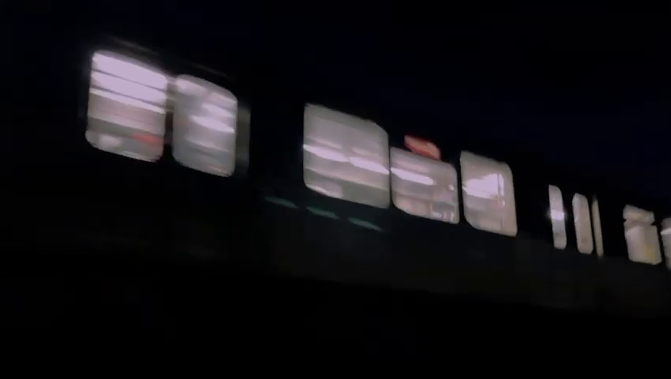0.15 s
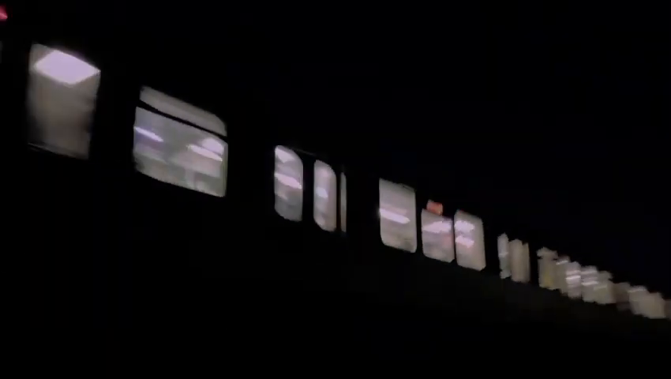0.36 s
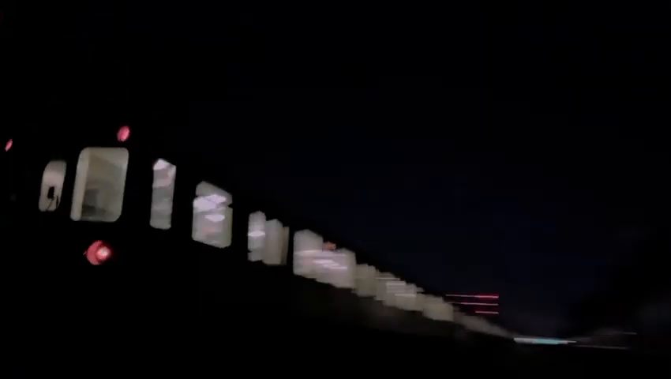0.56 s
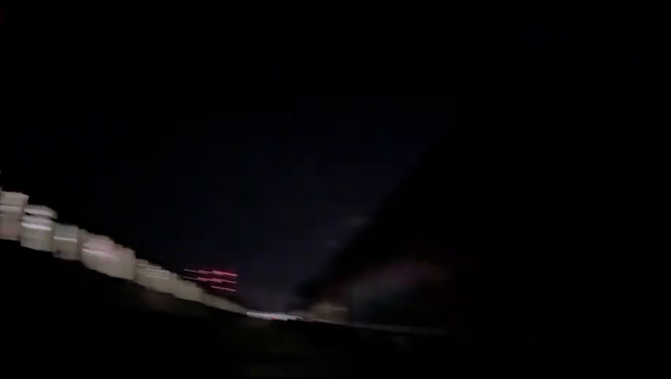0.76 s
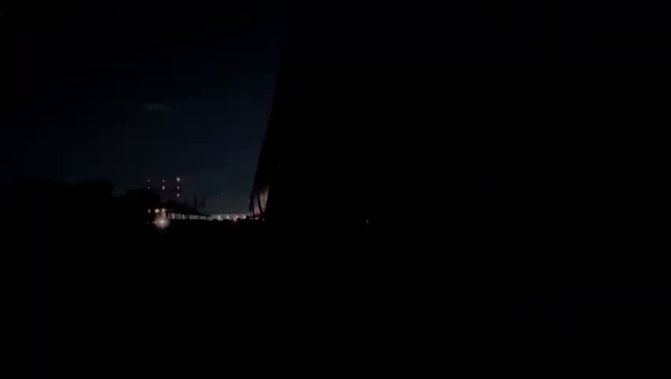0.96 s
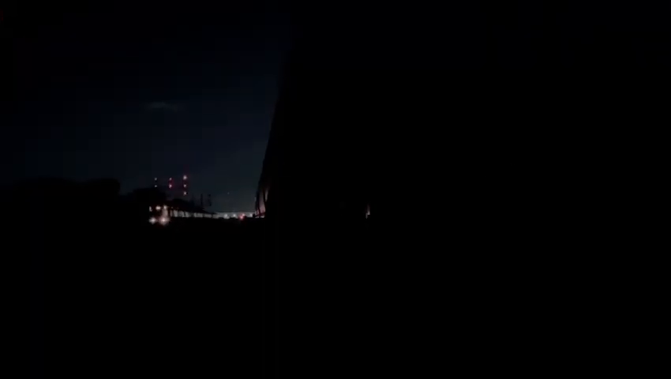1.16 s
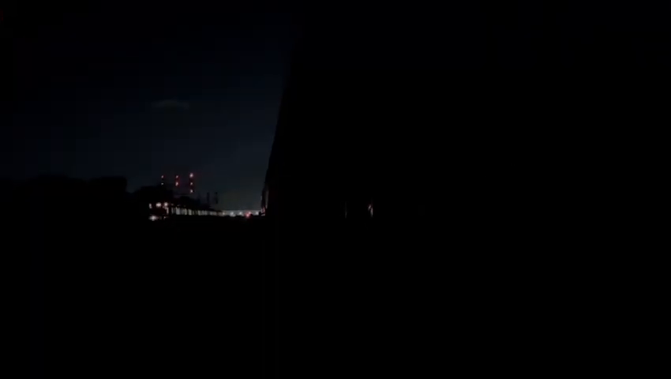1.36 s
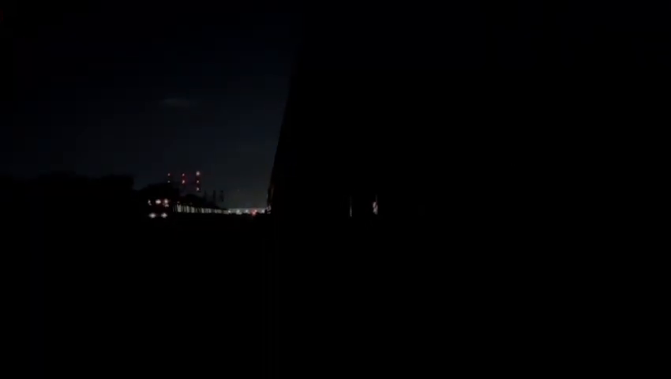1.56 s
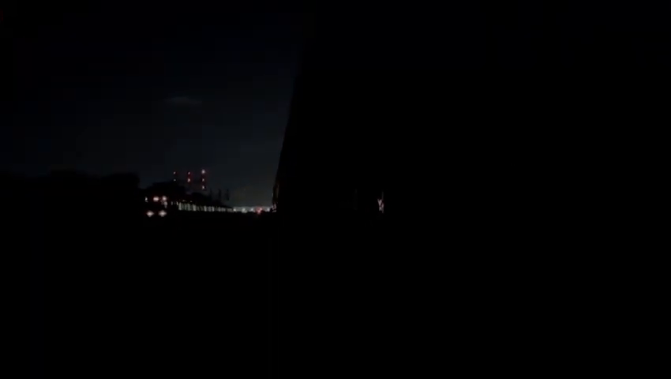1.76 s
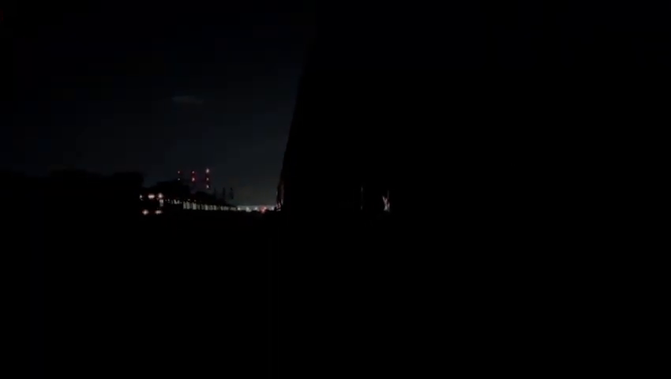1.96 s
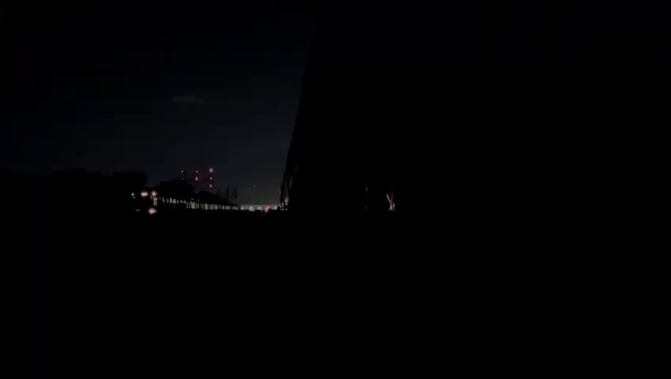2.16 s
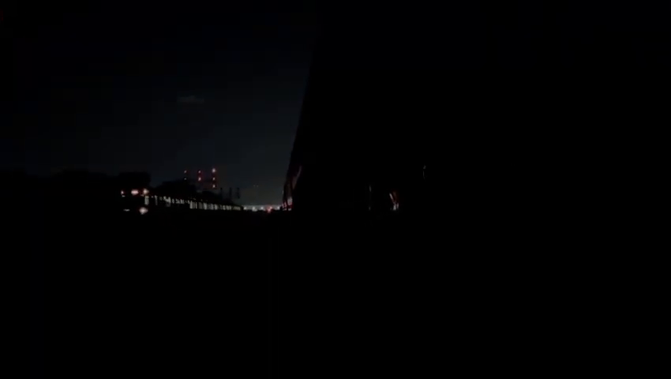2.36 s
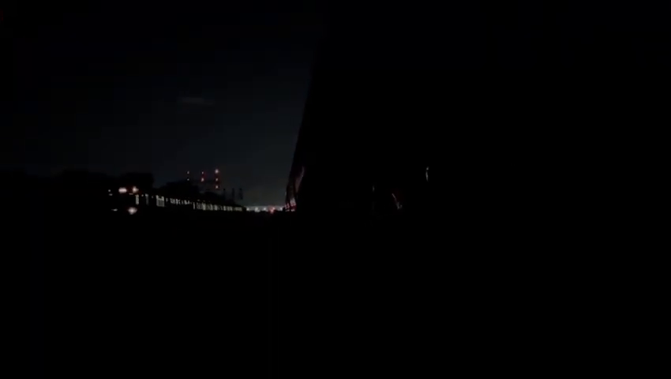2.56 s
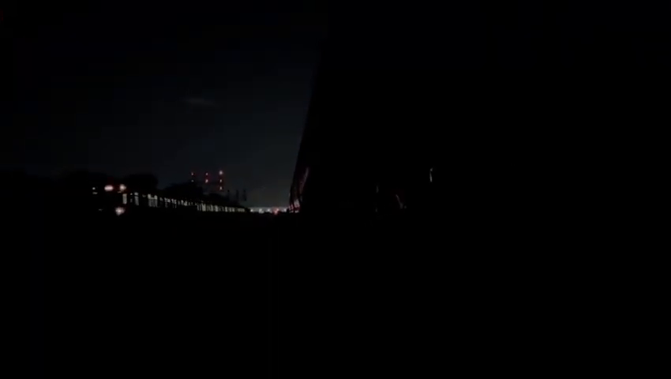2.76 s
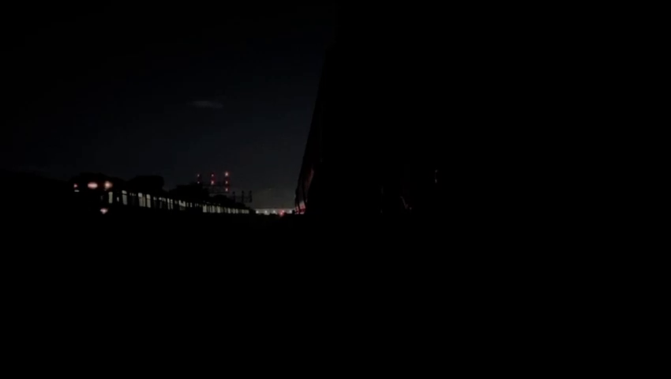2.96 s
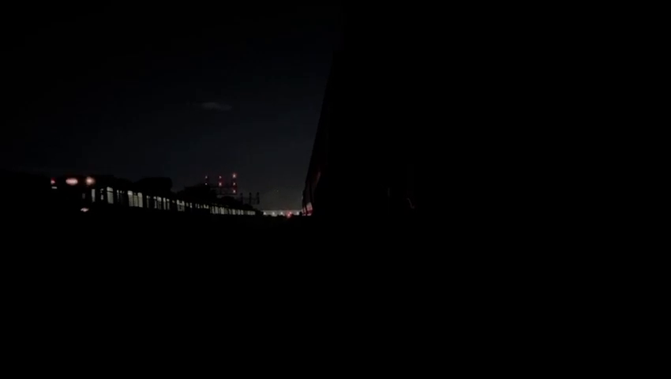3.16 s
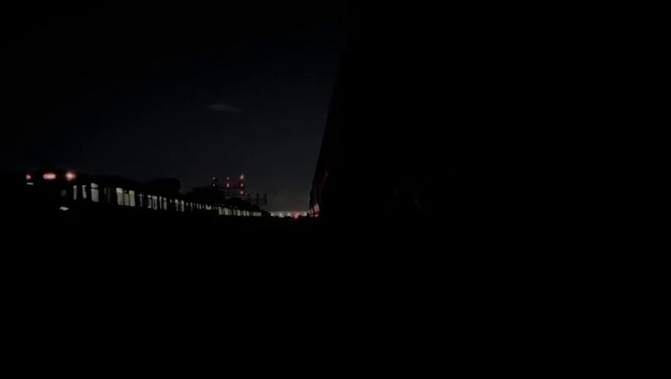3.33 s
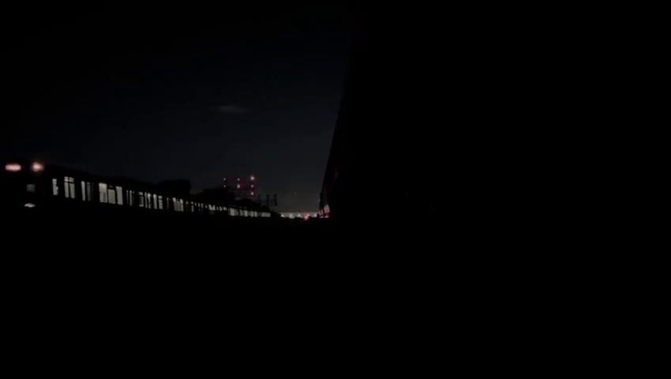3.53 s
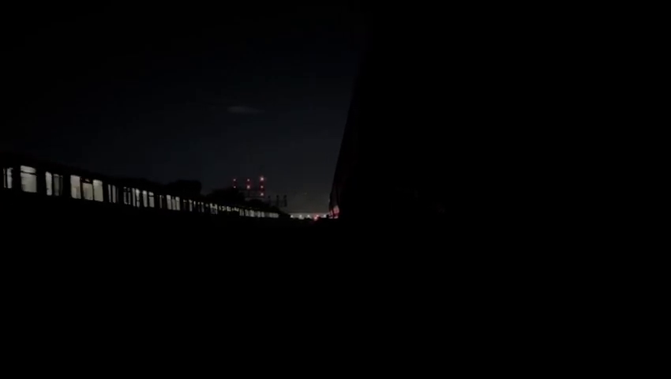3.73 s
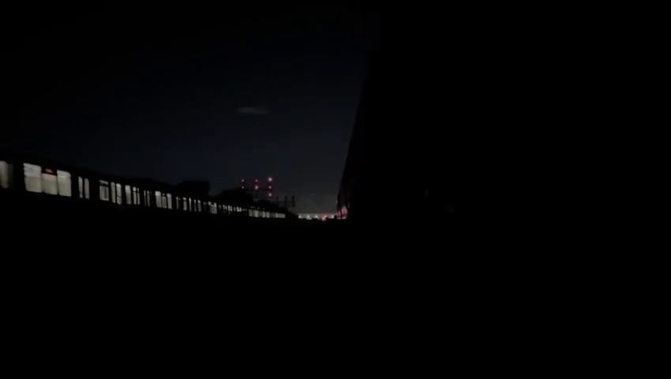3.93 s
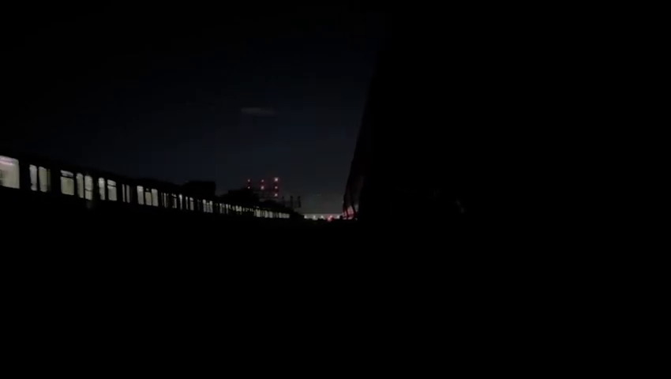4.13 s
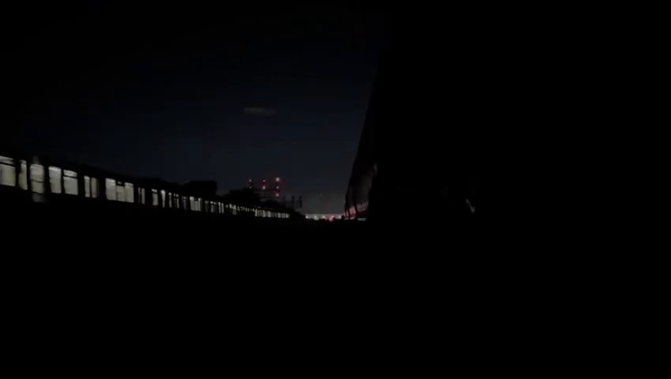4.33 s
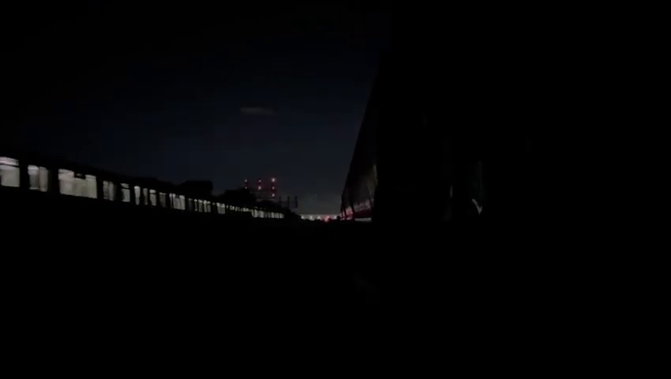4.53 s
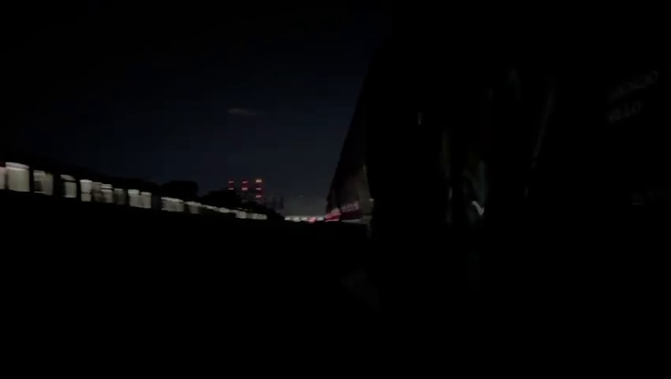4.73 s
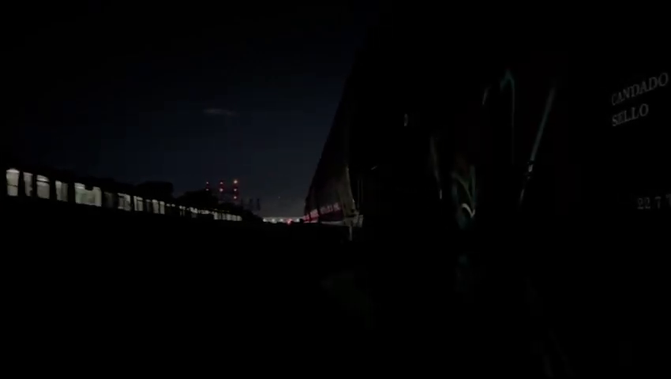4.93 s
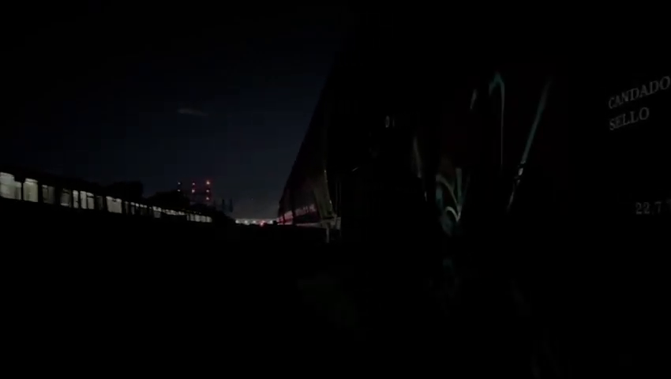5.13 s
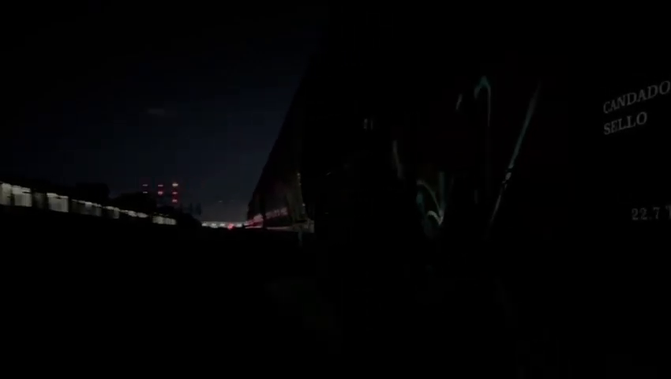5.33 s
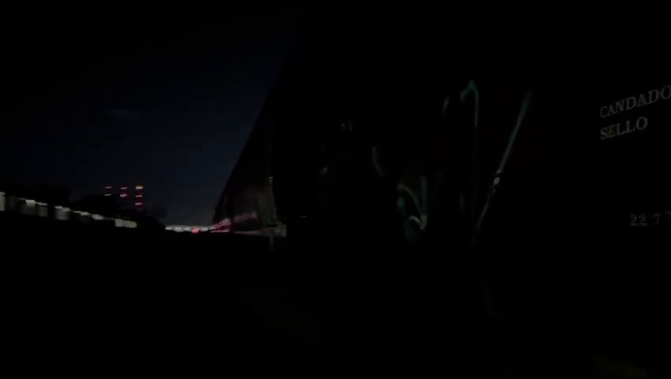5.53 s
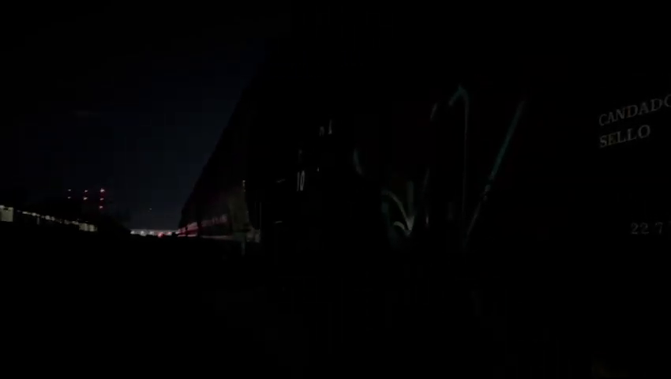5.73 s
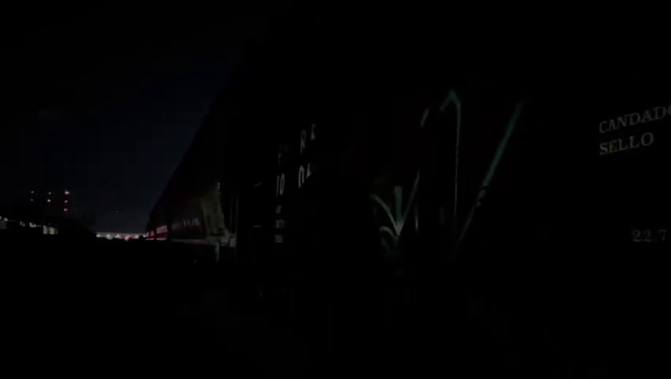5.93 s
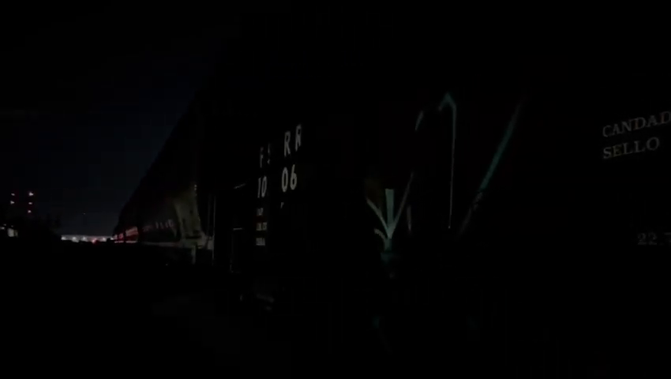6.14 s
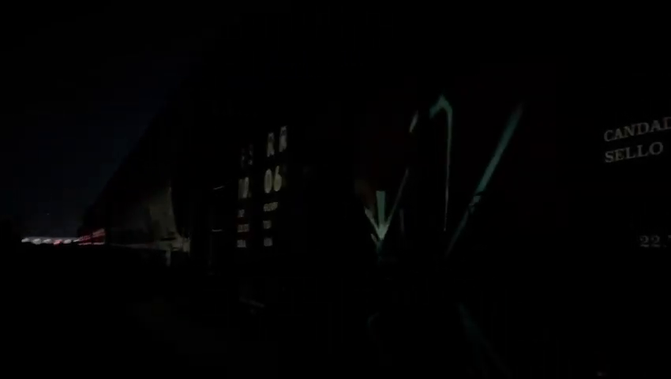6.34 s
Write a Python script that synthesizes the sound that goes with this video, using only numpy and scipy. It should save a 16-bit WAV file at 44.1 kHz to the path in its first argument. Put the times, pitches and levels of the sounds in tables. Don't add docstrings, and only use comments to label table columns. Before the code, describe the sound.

A fast train roars past close by, cuts to a quiet low yard rumble, then a second train approaches with clattering wheels and squeals.

```python
import sys
import numpy as np
from scipy import signal
from scipy.fft import rfft, irfft, next_fast_len
from scipy.io import wavfile
from scipy.ndimage import uniform_filter1d, map_coordinates

SR = 44100
rng = np.random.default_rng(int(sys.argv[2]) if len(sys.argv) > 2 else 0)


def invert_db(level):
    return 10 ** (np.asarray(level, dtype=float) / 20)


def dump_mix(stems):
    frames = np.atleast_2d(stems).T
    limited = np.clip(frames, -1, 1)
    pcm = np.round(limited * 32767).astype(np.int16)
    wavfile.write(sys.argv[1], SR, pcm)


N = 286209
BAND_EDGE_HZ = 9680

# (start [s], fade-in [s], end [s], fade-out [s])
SHOTS = [
    (-.01, 0.0012, 0.4084, .0002),
    (.417, .012, .947, .002),
    (.954, .004, 6.6, .002),
]
# (time [s], level [dB])
RUSH_LEVEL = [
    [(0.0, -22), (0.1, -24), (0.2, -25), (0.3, -25), (0.408, -26.5)],
    [(0.428, -24), (0.46, -24.5), (0.58, -28.5), (0.7, -27.5), (0.84, -28.5), (0.9, -30.5), (0.945, -33)],
]
# (frequency [Hz], level [dB per Hz])
FIRST_ROAR = [(120, -63), (200, -30), (318, -4), (494, -7.5), (536, 1.5), (576, -4.5), (724, -3.5),
              (1400, -16), (1820, -51), (3080, -120)]
SECOND_ROAR = [(120, -42), (200, -14.5), (329, -3), (396, -1), (490, -4.5), (724, 0.5), (978, -9.5),
               (1400, -21), (1820, -55), (3080, -120)]
# (frequency [Hz], level [dB per Hz])
RUSH_HISS = [(590, -15.5), (1000, 0), (1320, -6), (1470, -2), (2070, -8), (2750, -8.5), (3450, -16),
             (6100, -19), (9600, -20.5), (12500, -72), (21100, -120)]
# (time [s], length [s], frequency [Hz], level [dB])
RAIL_SONGS = [(0, 0.029, 601, -28), (.075, .04, 595, -23.5), (.13, .04, 732, -23.5), (.25, 0.048, 372, -33),
              (.29, .08, 537, -32), (.44, .05, 825, -26.5), (.52, .05, 736, -30), (.555, 0.034, 420, -30),
              (.2, 0.047, 900, -28.5), (.61, 0.0406, 722, -25), (.675, .04, 715, -32),
              (.69, 0.065, 379.6, -25), (.79, .08, 348, -28)]

# (time [s], level [dB])
COMING_LEVEL = [(.96, -51.5), (1.5, -49.5), (2, -47.5), (2.5, -46.5), (3, -43.5), (3.5, -40.5), (4, -38),
                (4.4, -35.5), (4.75, -35.5), (4.9, -32.5), (5.1, -32.5), (5.4, -33.5), (5.65, -31.5),
                (6, -33.5), (6.2, -33.5), (6.32, -31), (6.49, -33.5)]
# (time [s], share [0-1])
NEARNESS = [(.9, 0.18), (3.8, 0.15), (4.2, 0.39), (4.6, 0.57), (5.0, 0.43), (5.5, 0.76), (6.5, 0.98)]
# (frequency [Hz], level [dB per Hz])
FAR_ROAR = [(110, -46), (180, -6), (330, -0.5), (520, -3.5), (620, -2), (772, 3), (1030, -16.5), (1300, -3),
            (1690, -41), (2860, -120)]
NEAR_ROAR = [(110, -34), (180, -6), (270, -7.5), (361, 5.5), (523, 3), (785, 3), (942, -2.5), (1090, -2),
             (1300, -8), (1690, -67), (2860, -120)]
FAR_HISS = [(590, -49), (1000, -18.5), (1300, -8), (2000, -4), (2650, -11.5), (2850, -11.5), (4500, -17),
            (7200, -23.5), (9600, -19), (12500, -62), (21000, -120)]
NEAR_HISS = [(590, -12.5), (1000, -6.5), (1100, -3.5), (1730, -4.5), (1980, -5), (3110, -12), (3660, -14.5),
             (5190, -15.5), (7160, -16), (8900, -20), (9600, -21.5), (12500, -58), (21100, -120)]
# (frequency [Hz], width [Hz], left
# over the noise [dB], right over the noise [dB])
FAR_PEAKS = [(790, 180, 3.5, 0.5), (875, 124, 1, 8.5), (1312, 230, 9, 6), (1660, 100, -11, 1),
             (2536, 126, 9, 9.5), (3110, 130, 6.5, -0.5), (4190, 69, 10.5, 5.5)]
WHEEL_MODES = [(1113, 130, 6, 4.5), (1940, 240, 0.5, 1.5), (2290, 76, 5, 7.5), (3700, 100, 2.5, 10),
               (5040, 290, 4, 0)]
# (time [s], level over the rumble [dB])
GROUND_SURGES = [(1.1, 2), (1.3, -1), (2.6, 3), (2.78, 0), (3.45, 3), (4.5, 4.5), (5.02, 2.5), (5.66, 5.5),
                 (6.3, 1)]

# (time [s], peak [dB], length [s], brightness [dB])
JOINTS = [(2.177, -42, 0.065, -12), (2.613, -34.5, .09, -4), (3.086, -45, .09, -11), (3.63, -43, .09, -11),
          (4.148, -19, 0.03, -0.5), (4.34, -18, 0.1, -0.5), (4.514, -21.5, 0.075, -3),
          (4.622, -19.5, 0.13, -2), (4.822, -17, .11, 1.5), (5.004, -17, .14, -1), (5.194, -26, 0.072, -11),
          (5.342, -21.5, .075, -8), (5.5104, -15, 0.16, -2), (5.725, -17.5, .1, 5.5),
          (5.902, -18.5, 0.074, -1), (6.0494, -26, .09, -4), (6.2815, -17.5, 0.043, 1),
          (6.436, -23, .09, -5.5)]
# (frequency [Hz], level [dB per Hz])
CLATTER = [(500, -32), (1200, 7.5), (2000, 8), (3700, 0), (5200, 0), (6800, -3), (9000, -1), (12500, -32)]
# (time [s], length [s], frequency [Hz], level [dB])
SQUEALS = [(4.145, 0.024, 5350, -39), (4.345, 0.028, 3620, -33), (4.401, .04, 2877, -34),
           (4.616, 0.042, 5300, -40), (4.62, 0.046, 1315, -31), (4.662, 0.12, 3760, -43),
           (4.822, 0.068, 4780, -34), (4.985, 0.12, 2006, -34), (5.013, 0.096, 5230, -37),
           (5.031, 0.049, 3580, -39), (5.105, 0.05, 1970, -33.5), (5.492, 0.049, 5150, -45),
           (5.537, 0.08, 5215, -31.5), (5.57, 0.06, 2030, -36.5), (5.51, 0.043, 3520, -36.5),
           (5.896, 0.036, 3760, -43), (5.98, .12, 1080, -34.5), (6.16, .08, 1120, -36),
           (6.36, 0.082, 1090, -34)]

# (time [s], peak [dB])
TAPS = [
    (1.825, -33.5),
    (1.902, -21.5),
]
# (frequency [Hz], level [dB], decay by 60 dB [s], delay [ms])
HOUSING = [(504, 2.5, 0.011, 0.93), (1400, -9, 0.0071, 1.1), (2550, -10, .01, 1.15),
           (3780, -13, 0.011, 0.9), (5860, -18, 0.0098, 0.19), (9100, -29, 0.007, 0.44)]

# (frequency [Hz], level [dB per Hz])
YARD = [(12, -52), (20, -20), (42, -2.5), (60, 9.5), (72, 5.5), (155, -9), (260, -14), (340, -12),
        (570, -120)]
TOWN = [(88, -25), (150, -9), (334, -4.5), (473, -13.5), (965, -13), (1020, -11), (2190, -22.5),
        (2600, -23.5), (2890, -16), (4090, -30), (9600, -44), (12500, -77), (21100, -120)]
# (time [s], length [s], level [dB])
LOWER_GLINTS = [(0, 0.18, -59.5), (.22, 0.205, -73)]
UPPER_GLINTS = [(0, .41, -66.5), (.43, .42, -73.5), (4.124, .1, -70), (4.279, .085, -74),
                (4.38, 0.049, -69), (4.493, 0.033, -75), (4.607, 0.17, -69.5), (4.868, 0.3, -70),
                (5.195, 0.048, -76), (5.279, 0.17, -71), (5.491, .12, -59), (5.61, .24, -71),
                (5.87, 0.26, -68), (6.171, 0.042, -72), (6.263, 0.088, -65)]

# (left delay [ms], right delay [ms], level [dB])
FAR_PATHS = [
    (0, 0.452, -6.5),
    (1.532, 1.683, -8),
]
NEAR_PATHS = [
    (0, 0.494, -5.5),
    (1.94, 2.358, -28),
]
# (frequency [Hz], share from all sides [0-1], share from down the line [0-1])
DIFFUSE = [(30, 0.069, .1), (80, 0, 0.14), (150, .12, 0.38), (300, 0.027, .4), (600, 0.16, 0.32),
           (1500, 0.31, 0.21), (2800, 0.31, 0.071), (5000, 0.44, .08), (9000, 0.15, 0.038)]
# (frequency [Hz], left minus right [dB])
FACING = [(30, -1), (60, 4.5), (110, 12.5), (190, 8.5), (350, 3), (630, 4), (1120, 0.5), (2020, -1.5),
          (3630, 3), (6530, 5), (9600, -0.5)]


def rushing_train():
    level_db, = curves(np.vstack(RUSH_LEVEL))
    start_db = level_db[0]
    shake = wobble(30.2)
    first = arriving(FIRST_ROAR, NEAR_PATHS, patchy_db=2.2, tall=3, long=3)
    second = arriving(SECOND_ROAR, NEAR_PATHS, patchy_db=2.2, tall=3, long=3)
    in_first = np.arange(N) < SHOTS[1][0] * SR
    roar = invert_db(level_db + 0.8 * shake) * np.where(in_first, first, second)
    sleepers = filtered(roar, lambda hz: 1 / (1 + (hz / 560) ** 8))
    rails = invert_db(0.5) * (roar - sleepers)
    song = swelling(RAIL_SONGS, 0.03 * wobble(40)) * invert_db(3 + 1.5 * wobble(25))
    hiss_db = start_db - 8.5 + 0.91 * (level_db - start_db)
    hiss = invert_db(hiss_db + 1.1 * shake) * arriving(RUSH_HISS, NEAR_PATHS, patchy_db=1)
    rumble = invert_db(-45 + 1.5 * wobble(12)) * arriving(YARD, NEAR_PATHS[:1], patchy_db=1)
    return sleepers + delayed(song, 0.19) + rails + hiss + rumble


def coming_train():
    level_db, = curves(COMING_LEVEL)
    closer_db = level_db + 51
    near = np.clip(curves(NEARNESS)[0], 0, 1)
    shake = wobble(18)

    def blend(far, close):
        return np.sqrt(1 - near) * far + np.sqrt(near) * close

    roar = blend(arriving(FAR_ROAR, FAR_PATHS, patchy_db=1, modes=FAR_PEAKS),
                 arriving(NEAR_ROAR, NEAR_PATHS, patchy_db=2, modes=WHEEL_MODES))
    hiss = blend(arriving(FAR_HISS, FAR_PATHS, patchy_db=1, modes=FAR_PEAKS),
                 arriving(NEAR_HISS, NEAR_PATHS, patchy_db=1, modes=WHEEL_MODES))
    roar_db = -49.5 + 1.5 * near ** 2 + 1.113 * closer_db + 0.49 * shake
    t, half_s = np.arange(N) / SR, 0.035
    surge_db = sum(db * np.exp(-((t - s) / half_s) ** 2) for s, db in GROUND_SURGES)
    rumble = arriving(YARD, NEAR_PATHS[:1], patchy_db=1.5, tall=1, long=10)
    rumble_db = -39 + surge_db + 0.25 * closer_db
    return invert_db(roar_db) * roar + invert_db(level_db + 0.21 * shake) * hiss + invert_db(rumble_db) * rumble


def joints():
    dull, bright, t = np.zeros(N + SR), np.zeros(N + SR), np.arange(SR // 2) / SR
    for s, db, length, bright_db in JOINTS:
        decay = invert_db(db - 13 - 60 * t / 0.86)
        jolt = decay * (1 - np.exp(-t / 0.004)) / (1 + np.exp((t - length) / 0.014))
        start = round(s * SR)
        dull[start:][:len(t)] += jolt * invert_db(-bright_db)
        bright[start:][:len(t)] += jolt * invert_db(bright_db)
    rattle = arriving(CLATTER, NEAR_PATHS, patchy_db=1.7, tall=8, long=3, modes=WHEEL_MODES)
    rattle = invert_db(0.98 * wobble(60)) * rattle
    low = filtered(rattle, lambda hz: 1 / (1 + (hz / 3500) ** 2))
    return dull[:N] * low + bright[:N] * (rattle - low)


def squeals():
    tones = swelling(SQUEALS, 0.008 * wobble(120))
    return delayed(tones * invert_db(3.5 + 3.5 * wobble(200)), 0.5)


def knock():
    out, t = np.zeros(N), np.arange(SR // 20) / SR
    for s, db in TAPS:
        for hz, level, t60, late_ms in HOUSING:
            ring = invert_db(db + level - 60 * t / t60) * np.sin(2 * np.pi * hz * t)
            ring *= 1 - np.exp(-t / 0.00065)
            out[round((s + late_ms / 1000) * SR):][:len(t)] += 1.53 * ring
        crack = invert_db(db - 8 - 60 * t / 0.02) * (1 - np.exp(-t / 0.001))
        out[round(s * SR):][:len(t)] += crack * rng.standard_normal(len(t))
    return out * invert_db([[-0.6], [0.6]])


def town():
    return invert_db(-47) * arriving(TOWN, NEAR_PATHS[:1], patchy_db=2.5)


def faint_gap():
    roar = invert_db(-56) * arriving(SECOND_ROAR, NEAR_PATHS, patchy_db=1.1)
    return roar + invert_db(-53) * arriving(NEAR_HISS, NEAR_PATHS, patchy_db=1)


def treble_glints():
    hz, frame, z = signal.stft(rng.standard_normal(N), SR, nperseg=2048)
    luck = rng.random((len(hz) // 8 + 1, len(frame) // 2 + 1))
    luck = np.kron(luck, np.ones((8, 2)))[:len(hz), :len(frame)]
    chance = along([(9700, .6), (10800, .4), (11000, .6), (11500, .5), (11750, .06), (12300, .02)], hz)
    specks = signal.istft(z * (luck < chance[:, None]), SR, nperseg=2048)[1][:N]
    t = np.arange(N) / SR

    def strength(rows):
        steps = sum(invert_db(db) * ((t > s) & (t < s + length)) for s, length, db in rows)
        return uniform_filter1d(steps, size=400)

    lower = unit(filtered(specks, lambda hz: (hz > BAND_EDGE_HZ) & (hz < 10900)))
    upper = unit(filtered(specks, lambda hz: (hz > 11000) & (hz < 12330)))
    return strength(LOWER_GLINTS) * lower + invert_db(2.5 * wobble(14)) * strength(UPPER_GLINTS) * upper


def arriving(spectrum, paths, patchy_db, tall=4, long=6, modes=()):
    z = signal.stft(rng.standard_normal((4, N)), nperseg=1024)[2]
    patches = uniform_filter1d(rng.standard_normal(z.shape[1:]), tall, 0)
    patches = uniform_filter1d(patches, long, 1)
    noise = signal.istft(z * invert_db(patchy_db * unit(patches)), nperseg=1024)[1][:, :N]

    def colour(hz):
        peaks = sum(np.array([[left], [right]]) / (1 + (2 * (hz - centre) / width) ** 2)
                    for centre, width, left, right in modes)
        return invert_db(along(spectrum, hz) + peaks)

    def around(hz):
        return np.clip(along([row[:2] for row in DIFFUSE], hz), 0, 1)

    def ahead(hz):
        return np.clip(along([row[::2] for row in DIFFUSE], hz), 0, 1 - around(hz))

    def echoes(hz, ways):
        return sum(invert_db(db) * np.exp(-2j * np.pi * hz * np.array([[left], [right]]) / 1000)
                   for left, right, db in ways)

    def direct(hz):
        return np.sqrt(abs(1 - around(hz) - ahead(hz))) * echoes(hz, paths)

    def down_line(hz):
        return np.sqrt(ahead(hz)) * echoes(hz, [(0.25, 0.028, 0)])

    pair = filtered(noise[0], lambda hz: colour(hz) * direct(hz))
    pair += filtered(noise[1], lambda hz: colour(hz) * down_line(hz))
    pair += filtered(noise[2:], lambda hz: colour(hz) * np.sqrt(around(hz)))
    return pair / np.std(pair.mean(0))


def swelling(rows, drift):
    out = np.zeros(N)
    for s, length, hz, db in rows:
        start = max(round((s - 0.1 * length) * SR), 0)
        at = start + np.arange(round(1.2 * length * SR))
        tone = np.sin(2 * np.pi * hz * np.cumsum(1 + drift[at]) / SR)
        out[at] += invert_db(db) * np.hanning(len(at)) ** 0.77 * tone
    return out


def delayed(x, ms):
    return np.array([x, np.roll(x, round(ms * SR / 1000))])


def filtered(x, response):
    m = next_fast_len(N + 8192)
    return irfft(rfft(x, m) * response(np.fft.rfftfreq(m, 1 / SR)), m)[..., :N]


def wobble(rate):
    knots = rng.standard_normal(int(N * rate / SR) + 4)
    return map_coordinates(knots, [np.arange(N) * rate / SR])


def curves(rows):
    s, *cols = np.transpose(rows)
    return [np.interp(np.arange(N) / SR, s, c) for c in cols]


def along(points, hz):
    f, v = np.transpose(points)
    return np.interp(np.log(hz + 1), np.log(f + 1), v)


def unit(x):
    return x / np.sqrt(np.mean(x ** 2) + 1e-20)


def shot(index):
    start, rise, end, fall = SHOTS[index]
    t = np.arange(N) / SR
    return np.clip((t - start) / rise, 0, 1) ** 2 * np.clip((end - t) / fall, 0, 1)


def scene():
    coming = coming_train() + joints() + squeals() + knock() + town()
    layers = np.array([rushing_train(), coming, faint_gap()])
    rush, coming, gap = filtered(layers, lambda hz: hz < BAND_EDGE_HZ)
    return (shot(0) + shot(1)) * rush + shot(2) * coming + (1 - shot(2)) * gap


def roll_off(x):
    return signal.sosfilt(signal.butter(12, 12330, fs=SR, output="sos"), x)


def record(dry):
    def microphones(hz):
        shelf_db = -4 / (1 + (6950 / (hz + 1)) ** 30)
        return invert_db(along(FACING, hz) * np.array([[0.5], [-0.5]]) + shelf_db)

    mix = filtered(dry, microphones) + treble_glints()
    return roll_off(mix)


dry = scene()
out = record(dry)
dump_mix(out)
```